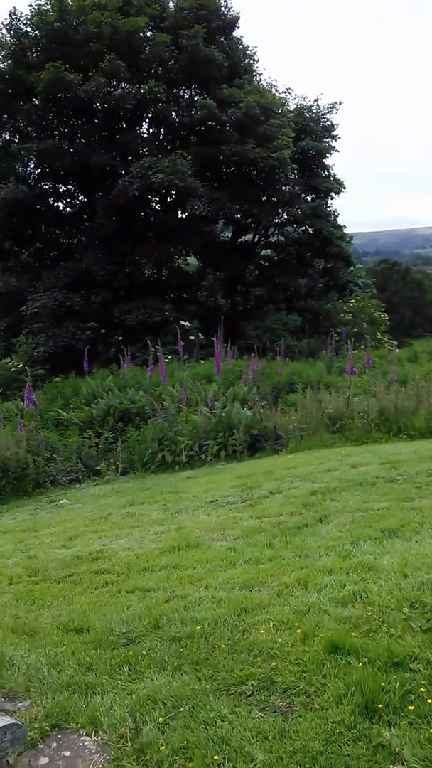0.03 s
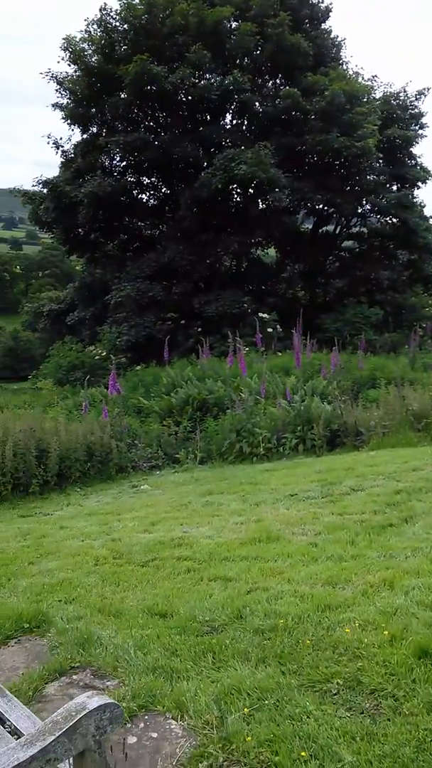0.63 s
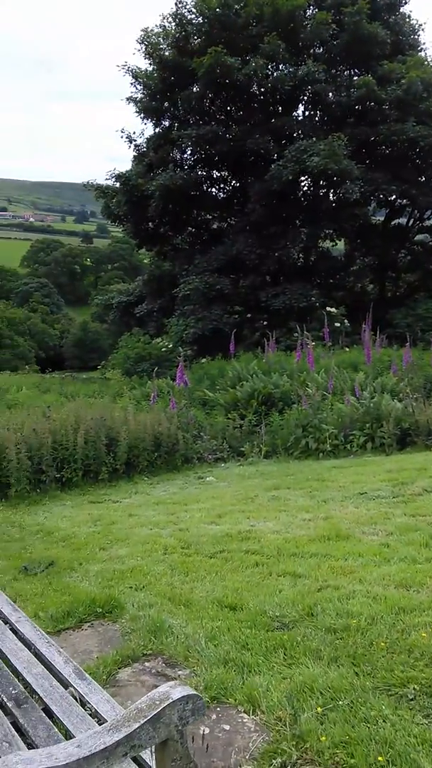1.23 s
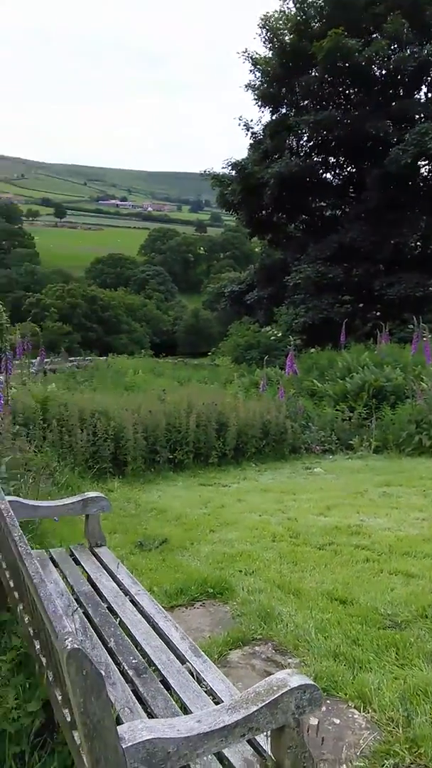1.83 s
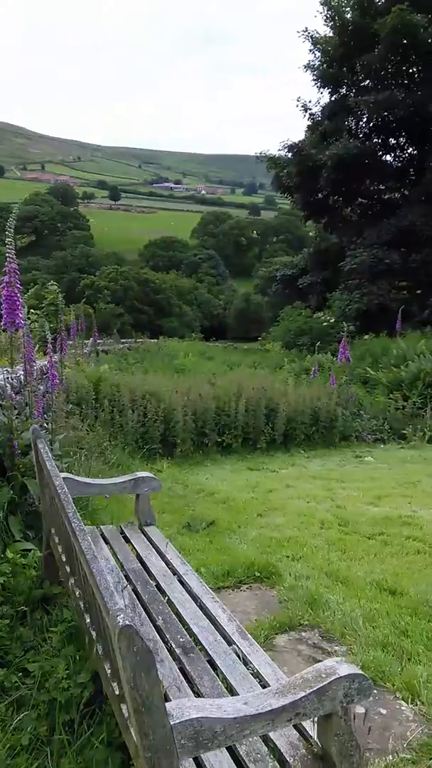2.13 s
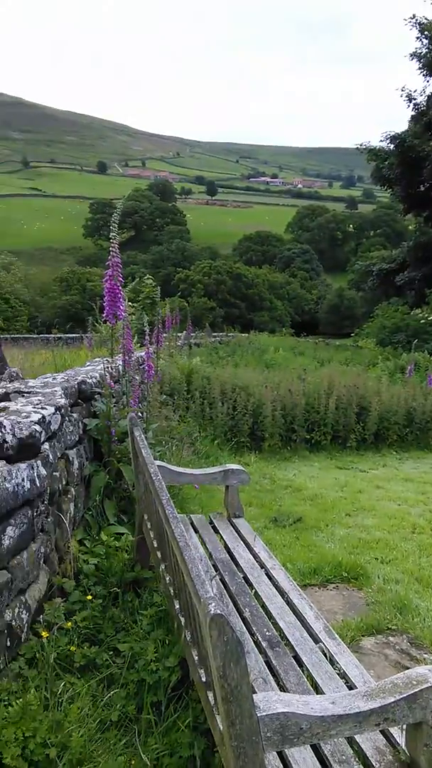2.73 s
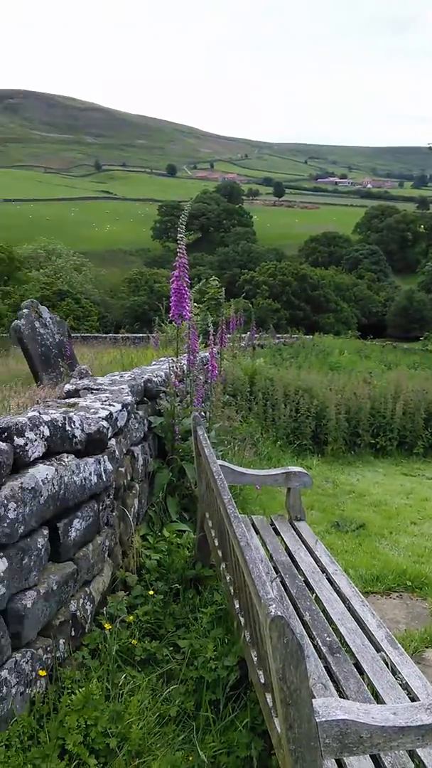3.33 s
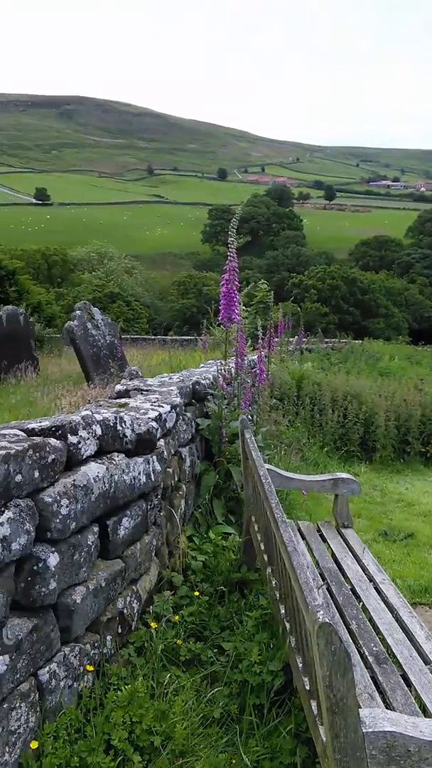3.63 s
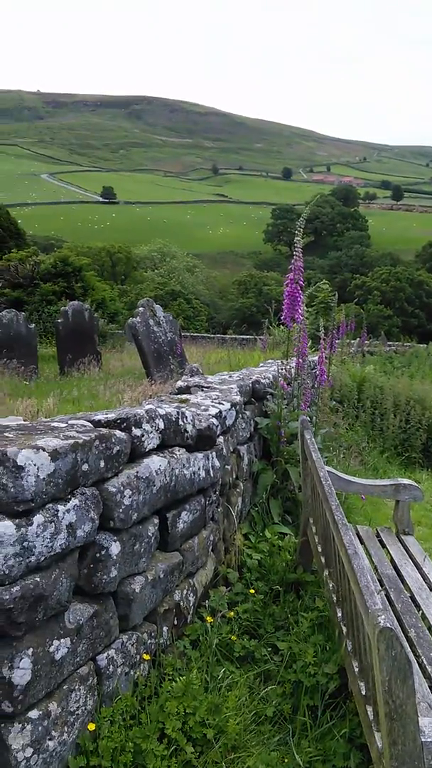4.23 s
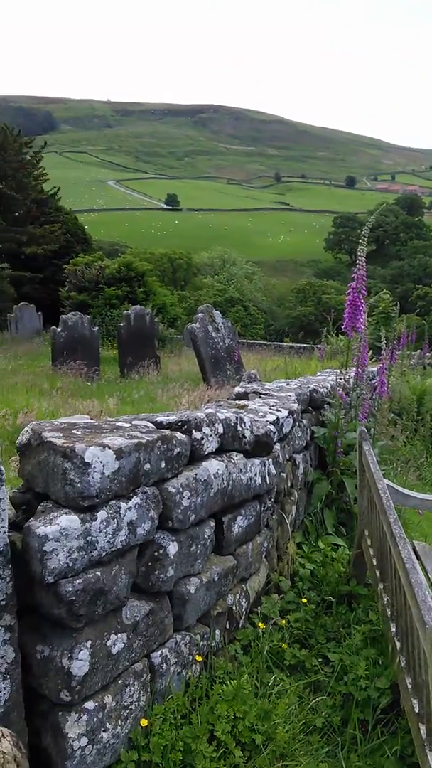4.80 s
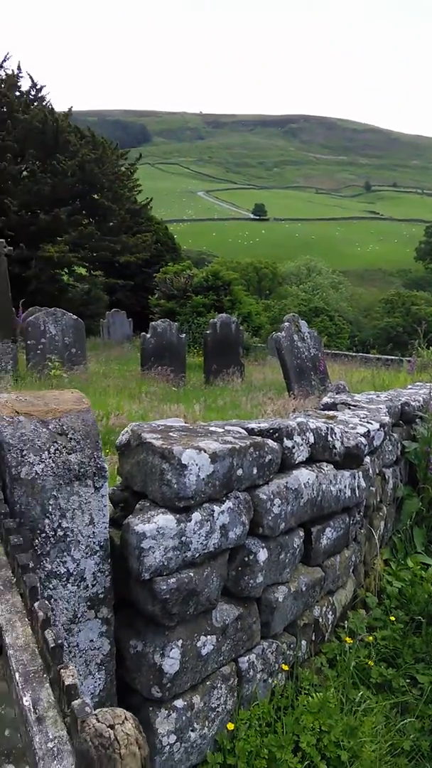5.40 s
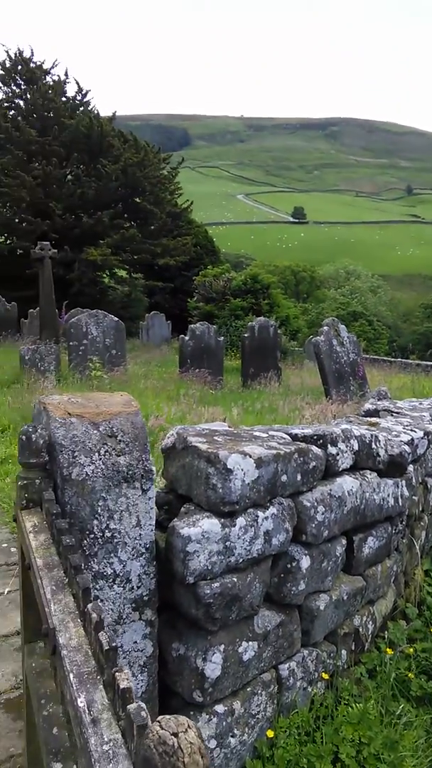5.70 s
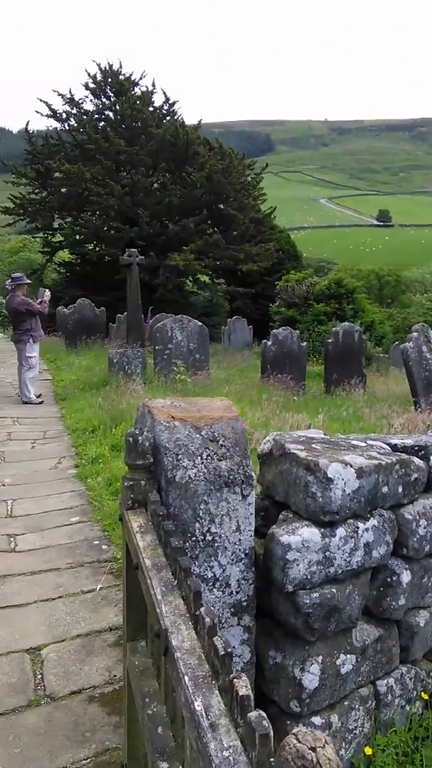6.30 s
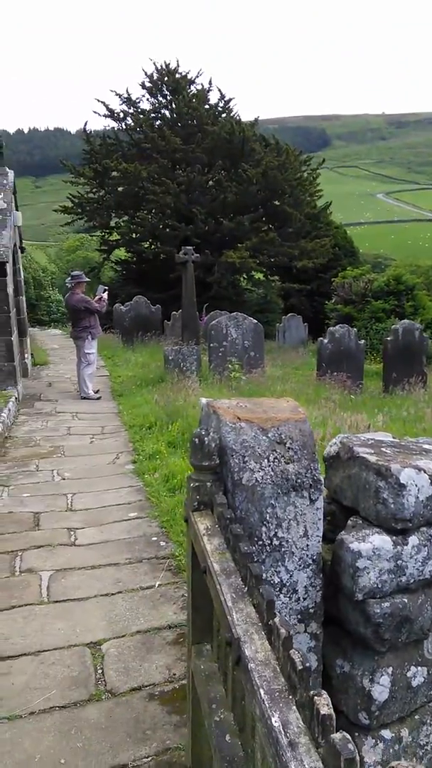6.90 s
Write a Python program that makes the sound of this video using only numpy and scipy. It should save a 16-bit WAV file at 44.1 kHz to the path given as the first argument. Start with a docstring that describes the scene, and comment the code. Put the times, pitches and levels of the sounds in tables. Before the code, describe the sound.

In open countryside, a nearby bird gives three swooping whistles, each flicking upward at the end and trailing a soft echo. Small birds chirp and twitter further off over a steady rush of air and leaves. A distant animal cries faintly at the start and again midway. Light wind bumps the microphone, mostly early on, and shoes brush through grass briefly. One bird chips close by near the end.

```python
"""A breezy country churchyard. A bird gives three long, swooping whistles that scatter back from
trees and stone walls. Small birds chirp further off, buzzing with a fast trill of the syrinx, and
one chips close by. A distant animal cries twice over the soft rush of the valley and its leaves.
Eddies of wind nudge the microphone, shoes brush the grass and clothes rustle."""
import sys
import numpy as np
from scipy import signal
from scipy.fft import rfft, irfft, next_fast_len
from scipy.io import wavfile

SR = 44100
rng = np.random.default_rng(int(sys.argv[2]) if len(sys.argv) > 2 else 0)


def file_out(sig):
    """Save sig as 16-bit WAV at sys.argv[1]."""
    # one column per channel
    cols = np.atleast_2d(sig).T
    # limit, then scale
    lim = np.clip(cols, -1, 1)
    pcm = np.round(lim * 32767).astype(np.int16)
    wavfile.write(sys.argv[1], SR, pcm)


N = 306495
TIME = np.arange(N) / SR


def whistler():
    """The nearest bird: three swoops, each trailing a smear of echoes."""
    # t/s, length/s, opening f/Hz, dip delay/s, dip f/Hz, flick rise/s, crest/dB, shoulder/dB, tip/dB
    whistles = [ (2.045, 0.56, 2493, 0.25, 2644, .128, -43, -41.5, -55.5),
                (4.148, 0.4986, 2650, 0.28, 2670, .092, -41.5, -39, -53.5),
                (4.964, 0.446, 2950, .272, 2545, 0.11, -34, -47.5, -60)]
    song = sum(swoop(*row) for row in whistles)
    return song + scatter(song, t60=0.89, wet_db=-2.0, tree_s=0.14, tree_width_s=0.035,
                          tree_share=0.21, sway=1.48, dull_hz=3890)


def swoop(s, length, opening_hz, dip_s, dip_hz, flick_s, crest_db, shoulder_db, tip_db):
    """One whistle climbs to a crest, sinks into a rough dip, regains a shoulder and flicks upward."""
    crest_hz, shoulder_hz, top_hz = 3040, 3036, 4450
    throb_hz, throb_depth_hz, sag_hz = 103.2, 83, 129
    crest, dip, shoulder, end = s + .1, s + dip_s, s + .42, s + length
    flick = np.sin(np.pi / 2 * progress(shoulder, shoulder + flick_s) ** 2)
    hz = (opening_hz + (crest_hz - opening_hz) * np.sin(np.pi / 2 * progress(s, crest))
          + (dip_hz - crest_hz) * np.sin(np.pi / 2 * progress(crest, dip)) ** 1.5
          + (shoulder_hz - dip_hz) * progress(dip, shoulder) ** 1.3
          + (top_hz - shoulder_hz) * flick)
    # the whistle sounds rough and fluttery as its pitch sags under the crest
    roughness = np.tanh((np.maximum.accumulate(hz) - hz) / sag_hz)
    throb = roughness * np.sin(phase_of(throb_hz * (1 + 0.0497 * drift(26.4))))
    effort_db = crest_db + (shoulder_db - crest_db) * progress(crest, shoulder)
    effort_db += (tip_db - shoulder_db) * flick
    fades_db = 12.5 * (1 - progress(s, crest) + progress(end - 0.038, end) ** 2)
    # the note weakens in the dip and throbs, as if beating against its echo
    db = effort_db - fades_db - 7.5 * roughness + 1.5 * throb
    return tone(hz + throb_depth_hz * throb, db, s, end, waver=0.00415, flutter_db=3.0, octave_db=-54)


def small_birds():
    """Birds in the trees arrive mostly as scattered sound; the close chip is drier."""
    # far chirps: t/s, length/s, start f/Hz, end f/Hz, level/dB, buzz depth/Hz
    far_calls = [ (1.575, 0.032, 2376, 2370, -54, 200), (1.58, 0.16, 3115, 3080, -57, 106),
                 (1.84, .13, 2887, 3700, -55, 120), (1.94, 0.11, 3927, 3786, -55.5, 212),
                 (2.97, .19, 5200, 5150, -75, 218), (3.165, 0.025, 4920, 3940, -61.5, 150),
                 (3.28, 0.077, 3930, 4040, -67.5, 120), (3.42, .031, 4660, 5460, -58.5, 130),
                 (3.48, 0.046, 2358, 2400, -51, 170), (3.56, 0.149, 2330, 2464, -59, 230),
                 (3.76, 0.03, 4900, 5270, -52.5, 260), (3.76, 0.031, 2725, 3010, -53.5, 132),
                 (3.97, 0.053, 5730, 5730, -58.5, 120), (3.97, 0.22, 6170, 6120, -71, 280),
                 (4.125, 0.046, 5790, 5450, -53, 150), (4.35, 0.22, 8200, 7640, -82, 130),
                 (4.545, 0.063, 7340, 6700, -65.5, 320), (4.735, 0.12, 2496, 2560, -54, 55),
                 (4.905, 0.15, 2670, 2710, -50, 49.7), (5.02, 0.051, 2050, 2290, -60, 60),
                 (5.24, 0.043, 5100, 5240, -65.5, 280), (6.585, 0.028, 2350, 2350, -56, 284),
                 (6.628, 0.057, 4510, 4460, -52, 220), (6.68, 0.15, 4340, 3896, -54.5, 272),
                 (6.8, .14, 3856, 3360, -55, 302), (6.93, 0.03, 4770, 5030, -58, 180)]
    # one sharp chip in two strokes: same columns
    chip_strokes = [(6.17, 0.03, 3350, 3373, -51.5, 90), (6.191, 0.0142, 3220, 2265, -50, 260)]
    far = chirps(far_calls, buzz_hz=109.5, rough=0.566)
    close = chirps(chip_strokes, buzz_hz=160, rough=0.67)
    echoes = scatter(far + from_db(-1.5) * close, t60=0.78, wet_db=-1.5, tree_s=0.11,
                     tree_width_s=0.018, tree_share=0.062, sway=1.83, dull_hz=7900)
    return from_db(-2.5) * far + close + echoes


def chirps(rows, buzz_hz, rough):
    """Short glides; a fast, uneven trill of the syrinx widens them into buzzes."""
    out = np.zeros(N + SR)
    for s, length, start_hz, end_hz, db, depth_hz in rows:
        size, at = int(length * SR), int(s * SR)
        trill = np.sin(phase_of(buzz_hz * (1 + .2 * drift(30.5, size)))) + rough * drift(250, size)
        hz = np.linspace(start_hz, end_hz, size) + depth_hz * trill
        envelope = from_db(db) * np.sqrt(2) * signal.windows.tukey(size, .5)
        out[at:at + size] += envelope * np.sin(phase_of(hz))
    return out[:N]


def chorus(count, level_db):
    """Faint twittering from all over the valley, at random times and pitches."""
    when, length, pitch, glide, strength = rng.random((count, 5)).T
    hz = 1900 * 2 ** (1.9 * pitch)
    end_hz = hz * (1 + .3 * (glide - .5))
    db = level_db - 13 * pitch + 4 * strength  # air takes more from the high notes
    rows = np.transpose([when * (N / SR - .1), 0.027 + .07 * length, hz, end_hz, db, .05 * hz])
    song = chirps(rows, buzz_hz=89.0, rough=0.64)
    return 0.72 * song + scatter(song, t60=0.62, wet_db=2, tree_s=0.15, tree_width_s=0.022,
                                 tree_share=0.19, sway=1.3, dull_hz=5900)


def far_cries():
    """An animal cries twice; distance leaves little but the lowest partial."""
    # one contour per cry, falling at its end: t/s, f/Hz, level/dB
    contours = [
        [(0, 893, -49), (.04, 900, -50), (.128, 900, -60.5), (.155, 894, -51), (.29, 883, -50), (.37, 852, -66)],
        [(3.36, 808, -67), (3.45, 865, -63.5), (3.51, 892.6, -51.5), (3.66, 896, -61), (3.8, 873, -59),
         (3.99, 863, -58), (4.19, 829.5, -73), (4.26, 835, -58), (4.46, 794, -66.5)],
    ]
    cries = sum(tone(*in_time(rows), rows[0][0], rows[-1][0], waver=0.0046, flutter_db=2.0, octave_db=-34)
                for rows in contours)
    return cries + scatter(cries, t60=.5, wet_db=-12, tree_s=.12, tree_width_s=.04,
                           tree_share=.2, sway=1.2, dull_hz=2000)


def wind():
    """Each eddy briefly swings the pressure at the microphone, over a lumpy rumble."""
    # rumble of the breeze: t/s, level/dB
    breeze = [(0, -86), (.55, -85), (.8, -69), (1.5, -76), (1.9, -96), (2.5, -84), (3.2, -90), (3.45, -103),
              (4.3, -108), (4.6, -85), (5.0, -109), (6.95, -106)]
    # eddies: t/s, level/dB, half-length/s
    puffs = [(0.298, -64, 0.023), (0.759, -50, 0.012), (0.794, -56, .016), (0.842, -54, .016),
             (0.896, -47.5, 0.0084), (0.997, -46.5, .013), (1.121, -52.5, 0.031), (1.355, -58, 0.019),
             (1.517, -60, 0.028), (2.165, -69, 0.026), (2.292, -59, .03), (3.121, -53.5, 0.014),
             (3.16, -67, .024), (4.697, -57.5, 0.019), (4.76, -54, .019), (6.148, -69.5, 0.042)]
    breeze_db, = in_time(breeze)
    lumps = from_db(breeze_db + 4.6 * drift(18))
    out = lumps * noise([(15, 0.5), (40, 5.5), (85, -6), (150, -16), (260, -32), (600, -71)])
    for (s, db, width), turn in zip(puffs, rng.random(len(puffs))):
        near = np.abs(TIME - s) < 4 * width
        t = TIME[near] - s
        swing_hz = 78.8 * (0.0202 / width) ** 0.23  # smaller eddies swing faster
        wobble = 1 + 0.59 * np.tanh(drift(70, len(t)))
        swing = np.cos(2 * np.pi * turn + phase_of(swing_hz * wobble))
        push = .25 * np.sign(turn - .5)  # one slower shove from the whole eddy
        out[near] += from_db(db) * np.exp(-(t / width) ** 2) * (swing + push)
    return signal.sosfilt(signal.butter(4, [18, 200], "band", fs=SR, output="sos"), out)


def walker():
    """Soles brush through grass in brief grainy swishes; clothes rustle low as the walker turns."""
    # shoe strokes: t/s, level/dB, half-length/s, low-pass f/Hz
    steps = [(1.632, -57, 0.061, 2500), (4.993, -64.5, 0.027, 2500), (5.299, -58.5, 0.049, 2200),
             (5.541, -51.5, 0.01, 9100), (5.572, -51.5, 0.021, 9200), (5.63, -60.5, 0.088, 4000),
             (5.934, -60.5, 0.027, 1230)]
    # colour of sole on grass: f/Hz, relative level/dB
    scuff = [(200, -57), (400, -21.5), (700, 0.5), (1000, 6), (1400, -4.5), (2000, -3), (3500, -16),
             (5500, -11), (8000, -27.5), (15000, -33)]
    # swells of cloth: t/s, level/dB, half-length/s
    clothes = [(1.63, -83, 0.31), (4.71, -86.5, 0.18), (5.28, -76, 0.058)]
    swish = noise(scuff) * from_db(0.77 * drift(120))
    shoes = np.zeros(N)
    for s, db, width, dull_hz in steps:
        shoes += swell(s, db, width) * signal.lfilter(*signal.butter(1, dull_hz, fs=SR), swish)
    rustle = from_db(-93) + sum(swell(*row) for row in clothes)
    cloth = noise([(150, -27), (290, -9.5), (370, 3.0), (450, -1.0), (700, -13), (2000, -50)])
    return shoes + rustle * cloth


def valley():
    """A bed of far rush and nearer leaves, both swaying slightly."""
    # ride of the rush: t/s, level/dB
    rush_ride = [(0, -56.5), (.6, -56), (1.15, -58), (1.64, -56), (2.75, -60), (3.7, -59), (4.1, -59.5),
                 (6.3, -60), (6.95, -57.5)]
    # colours of the rush and the leaf hiss: f/Hz, relative level/dB
    rush_colour = [(60, -50), (200, -28.5), (330, -20), (480, -18), (580, -9), (700, 5.5), (900, 2.5),
                   (1200, -2), (2000, -4), (2800, -6), (3600, -16), (6000, -48.5)]
    leaf_colour = [(1500, -18), (3000, 2), (4200, 2), (5400, 0), (6300, -8), (8000, -15.5), (12000, -21)]
    rush_db, = in_time(rush_ride)
    leaf_db = -70.5 + 2.5 * np.exp(-((TIME - 3.2) / 2.6) ** 2)  # the leaves stir more midway
    rush = from_db(rush_db + 0.18 * drift(1.5)) * patchy(noise(rush_colour), patch_db=2.5)
    leaves = from_db(leaf_db + .6 * drift(27)) * noise(leaf_colour)
    return rush + leaves


def patchy(x, patch_db):
    """Moving air lets each third of an octave from 500 to 4000 Hz swell and fade on its own."""
    size = next_fast_len(N)
    bin_hz = np.arange(size // 2 + 1) * SR / size
    thirds = np.clip(3 * np.log2((bin_hz + 1) / 500), 0, 9)
    spectrum = rfft(x, size)
    bands = (irfft(spectrum * np.maximum(1 - np.abs(thirds - k), 0), size)[:N] for k in range(10))
    return sum(band * from_db(patch_db * drift(17.7)) for band in bands)


def scatter(x, t60, wet_db, tree_s, tree_width_s, tree_share, sway, dull_hz):
    """Countless small echoes from grass and walls, and a later cluster from the big trees."""
    t = np.arange(int(1.5 * SR)) / SR
    near = from_db(-60 * t / t60) * (1 - np.exp(-t / 0.002))
    trees = tree_share * np.exp(-((t - tree_s) / tree_width_s) ** 2)
    paths = (near + trees) * rng.standard_normal((3, len(t)))
    echoes = signal.fftconvolve(x[None], paths / np.linalg.norm(paths), axes=1)[:, :N]
    # moving foliage makes each group of echoes swell and fade, and absorbs their top
    out = sum(echo * np.sqrt(2) * np.cos(2 * np.pi * rng.random() + sway * drift(14.0))
              for echo in echoes)
    return from_db(wet_db) * signal.sosfilt(signal.butter(4, dull_hz, fs=SR, output="sos"), out)


def tone(hz, db, start, end, waver, flutter_db, octave_db):
    """A nearly pure note that wavers a little, with rounded edges."""
    phase = phase_of(hz * (1 + waver * drift(65)))
    gate = np.sin(np.pi / 2 * np.clip(np.minimum(TIME - start, end - TIME) / 0.0021, 0, 1)) ** 2
    level = from_db(db + flutter_db * drift(35)) * gate
    return np.sqrt(2) * level * (np.sin(phase) + from_db(octave_db) * np.sin(2 * phase))


def noise(colour):
    """Unit-power noise shaped by rows of f/Hz, relative level/dB."""
    hz, db = np.transpose(colour)
    size = next_fast_len(N)
    bin_hz = np.arange(size // 2 + 1) * SR / size
    gain = from_db(np.interp(np.log(bin_hz + 1), np.log(hz), db))
    return rms_one(irfft(rfft(rng.standard_normal(size)) * gain, size)[:N])


def drift(rate_hz, size=N):
    """Smooth random motion with a spread of about one."""
    pole = np.exp(-80 * np.pi * rate_hz / SR)
    jitter = rng.standard_normal(size // 40 + 4002)
    slow = signal.lfilter([1], [1, -2 * pole, pole * pole], jitter)[2000:]
    return np.interp(np.arange(size) / 40, np.arange(len(slow)), rms_one(slow))


def swell(s, db, width):
    """A bell-shaped envelope peaking at time s."""
    return from_db(db) * np.exp(-.5 * ((TIME - s) / width) ** 2)


def progress(start, end):
    """A ramp from zero to one between two times."""
    return np.clip((TIME - start) / (end - start), 0, 1)


def in_time(rows):
    """Each column of a breakpoint curve at every sample."""
    s, *columns = np.transpose(rows)
    return [np.interp(TIME, s, column) for column in columns]


def phase_of(hz):
    """Running phase of a gliding pitch."""
    return 2 * np.pi * np.cumsum(hz) / SR


def from_db(db):
    """Decibels to gain."""
    return 10 ** (np.asarray(db) / 20)


def rms_one(x):
    """Scale to unit power."""
    return x / np.sqrt(np.mean(x ** 2) + 1e-20)


def scene():
    """Everything reaches one microphone."""
    birds = whistler() + small_birds() + chorus(count=70, level_db=-67.0)
    return (birds + far_cries() + valley() + wind() + walker())[None]


def record(dry):
    """Faint microphone hiss is added and the top is cut."""
    hiss_db, cutoff_hz = -76, 15750
    hissing = dry + from_db(hiss_db) * rng.standard_normal(dry.shape)
    return signal.sosfilt(signal.ellip(12, .1, 80, cutoff_hz, fs=SR, output="sos"), hissing)


dry = scene()
out = record(dry)
file_out(out)
```